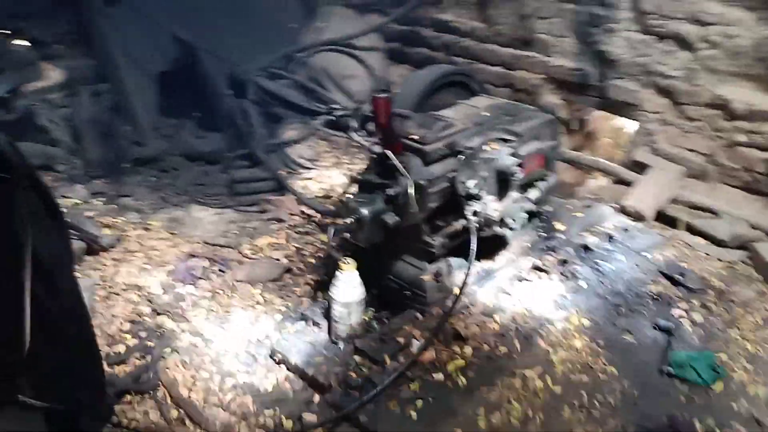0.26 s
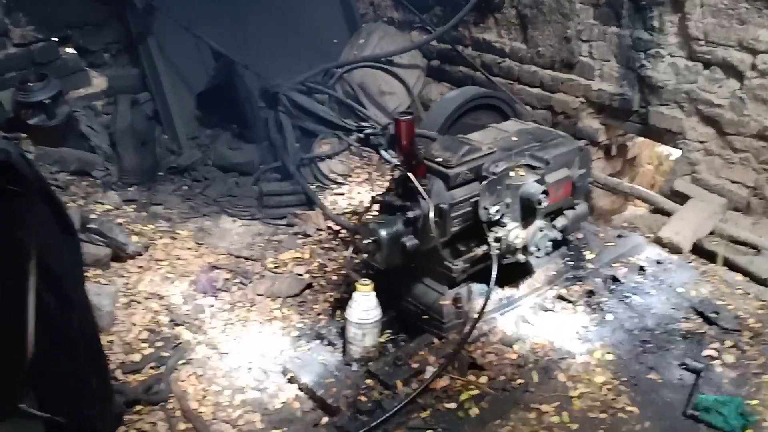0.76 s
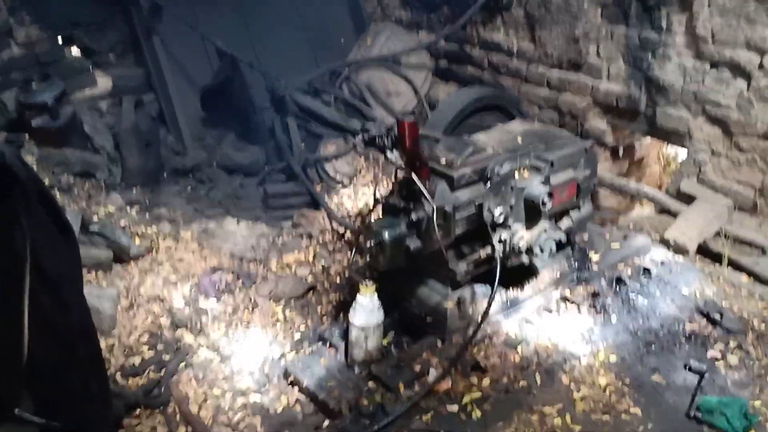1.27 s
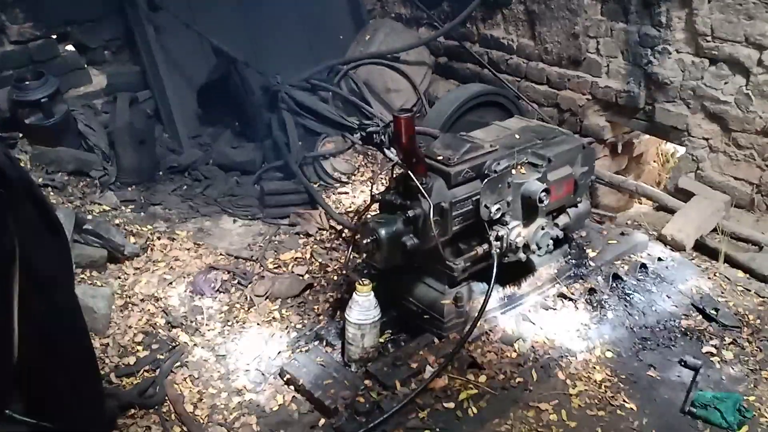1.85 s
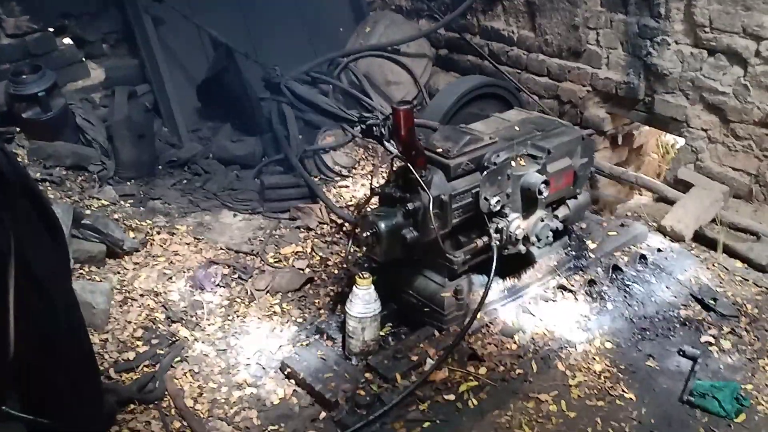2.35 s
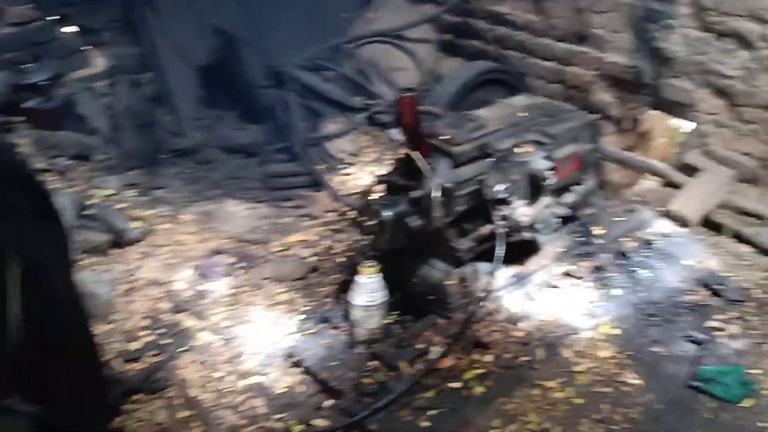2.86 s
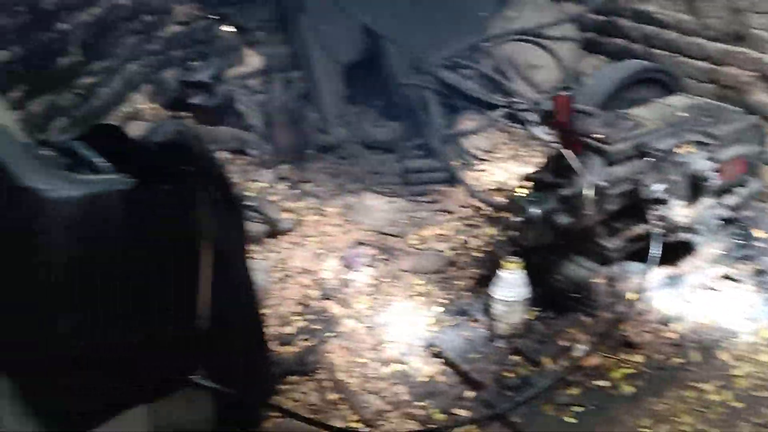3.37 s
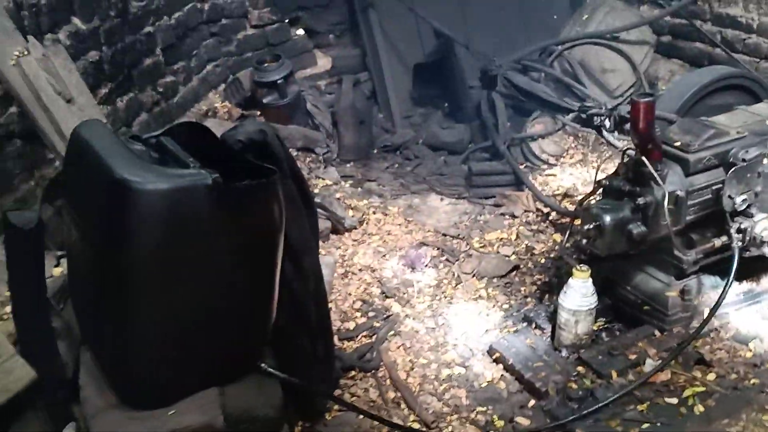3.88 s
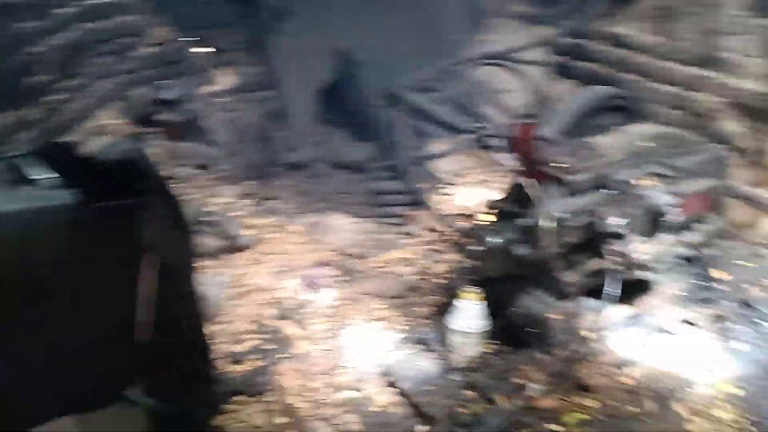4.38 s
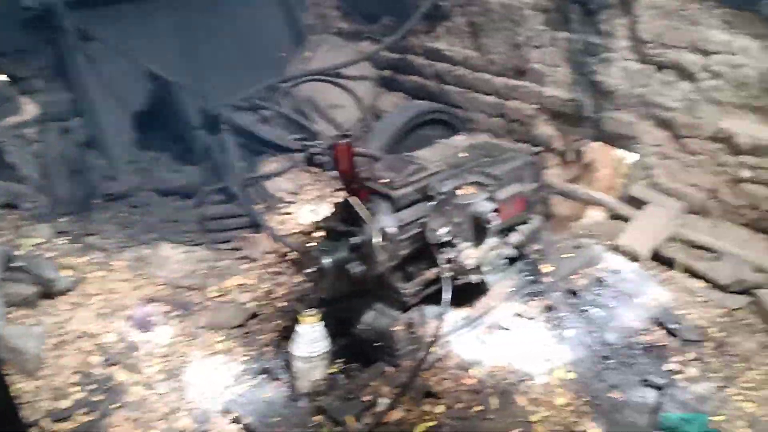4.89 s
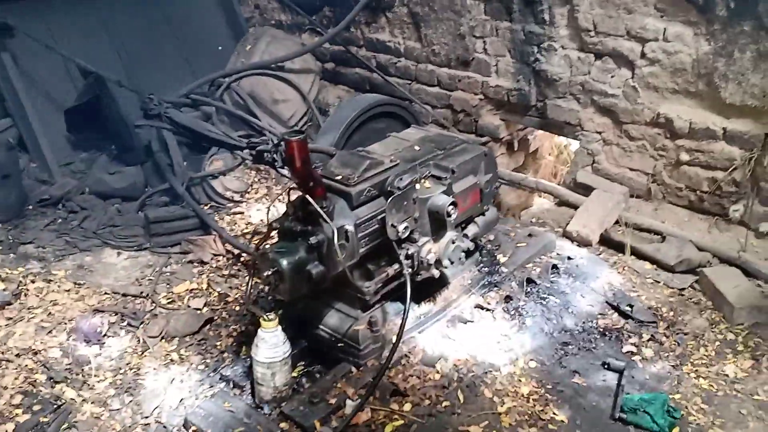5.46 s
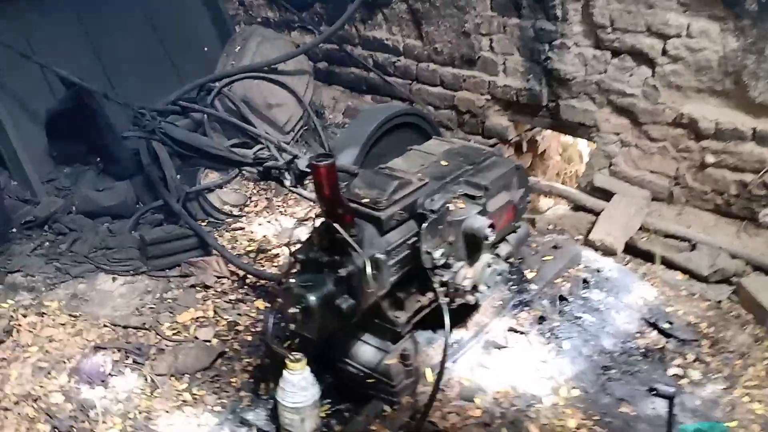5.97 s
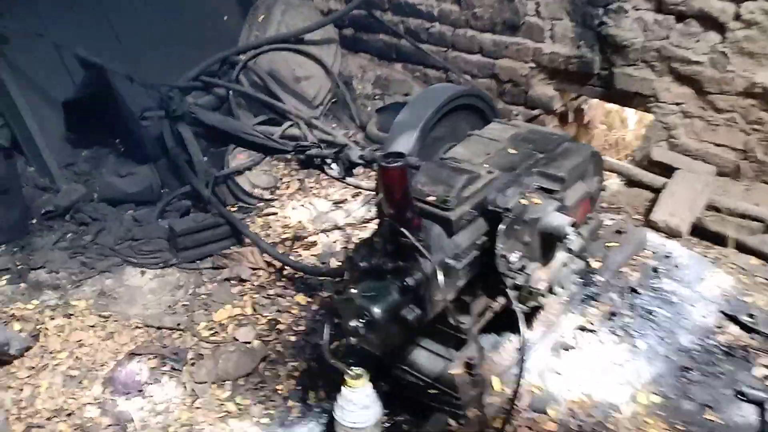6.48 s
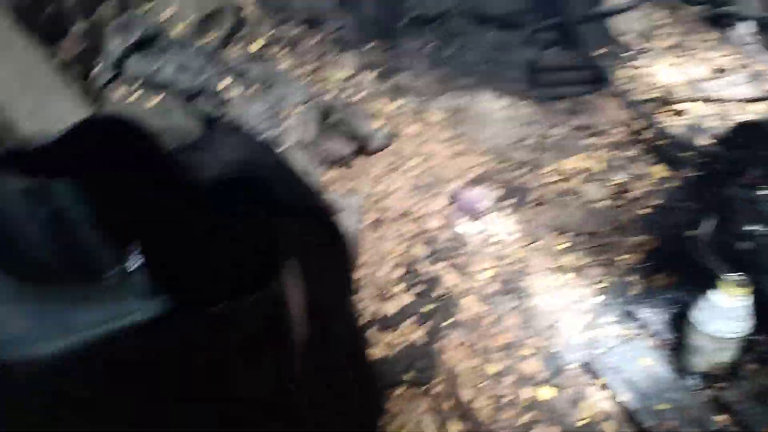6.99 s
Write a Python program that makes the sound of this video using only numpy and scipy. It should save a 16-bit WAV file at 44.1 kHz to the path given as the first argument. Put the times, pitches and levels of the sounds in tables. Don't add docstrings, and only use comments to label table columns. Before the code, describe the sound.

From 0 to about 0.7 seconds, a single-cylinder diesel engine is heard across a boomy shed: rough exhaust blasts roughly every 0.094 seconds, blurred by long echoes and a low boom at each firing. At 0.7 the scene cuts at once to beside the engine. The chugging continues at the same quick, steady pace to the end near 7.2 seconds, now drier and sharper, each fluttering gas burst ringing the thin silencer shell, then valve, rocker and pump knocks on the iron block, with a tiny injector hiss. From 1.3 to 1.7 the tone turns more mid-heavy, then brighter until 2.3. Individual blasts vary in strength, with stronger ones around 3, 3.7 and 6.3. After 4.4 the block knocks grow fuller and closer. Faint running water with small splashes and a soft low rumble lie beneath. Stereo, bass-thin small microphone.

```python
import sys
import numpy as np
from scipy import signal
from scipy.fft import rfft, irfft, next_fast_len
from scipy.io import wavfile
from scipy.ndimage import uniform_filter1d

SR = 44100
rng = np.random.default_rng(int(sys.argv[2]) if len(sys.argv) > 2 else 0)


def unload_wav(signal):
    wavfile.write(
        sys.argv[1],
        SR,
        np.round(np.clip(np.atleast_2d(signal).T, -1, 1) * 32767).astype(np.int16),
    )


def linear_from_db(decibels):
    return 10 ** (np.asarray(decibels, float) / 20)


N = 319284
T = np.arange(N) / SR
M = next_fast_len(N)
HZ = np.fft.rfftfreq(M, 1 / SR)

CUT_S = .695
CYCLE_S = .093872
FIRST_BLAST_S = .7211
SEAT_S = .026


def along(table, hz=HZ):
    f, db = np.transpose(table)
    return np.interp(np.log(hz + 1), np.log(f), db)


def level(x, db):
    return x * linear_from_db(db) / np.sqrt(np.mean(x ** 2))


def walk(rate):
    k = int(SR / rate)
    held = np.repeat(rng.standard_normal(N // k + 1), k)
    return 1.18 * uniform_filter1d(held, k)[:N]


def ring(x, hz, t60):
    p = np.exp(2j * np.pi * hz / SR - np.log(1000) / (t60 * SR))
    return signal.lfilter([0, p.imag], [1, -2 * p.real, abs(p) ** 2], x)


def pair(same_hz, same=.7):
    mid, side = rfft(rng.standard_normal((2, M)))
    likeness = same / (1 + (HZ / same_hz) ** 3)
    return mid * np.sqrt(1 + likeness) + np.array([[1], [-1]]) * side * np.sqrt(1 - likeness)


def strikes(s, db, contact_ms):
    x = np.zeros(N)
    keep = (s >= 0) & (s < T[-1])
    x[(s[keep] * SR).astype(int)] = linear_from_db(db[keep])
    push = np.hanning(int(contact_ms * SR / 1000) + 3)
    return np.convolve(x, push / push.sum())[:N]


# pitch_hz, level_db, t60_s
SHELL_PANELS = [(1100, -50.5, 0.034), (1960, -53, .04), (2377, -48, .04), (2752, -42.5, 0.039),
                (3100, -43, .04), (4154, -45, .06), (4567, -45, .05), (5000, -43.5, 0.034),
                (5590, -46.5, 0.034)]


def exhaust(s, band_db, pan_db, gas_db, ear_tilt, blast_shape, same_hz, same, size):
    rise, hold, sag_db, flutter_db, *t60, db = blast_shape
    t = T[:size]
    latest = np.clip(np.searchsorted(s, t) - 1, 1, None)
    side = np.array([[.5], [-.5]])
    jet = pair(same_hz, same) * linear_from_db(gas_db + side * along(ear_tilt))
    low = 1 / (1 + (HZ / 1650) ** 5)
    high = 1 / (1 + (3300 / (HZ + 1)) ** 6)
    gas = 0
    for share, gain_db, tail in zip((low, 1 - low - high, high), band_db, t60):
        power = 0
        for j in (latest, latest - 1):
            age = np.clip(t - s[j], 0, None)
            fade_db = sag_db * np.minimum(age / hold, 1) - 60 * np.clip(age - hold, 0, None) / tail
            onset = np.minimum(age / rise, 1) ** 1.5
            power = power + (onset * linear_from_db(gain_db[j] + fade_db)) ** 2
        eddies_db = flutter_db * (walk(300) + np.array([walk(90), walk(90)]))[:, :size]
        gas = gas + np.sqrt(power) * linear_from_db(eddies_db) * irfft(jet * share, M)[:, :size]
    mix_db = 5.36 * rng.standard_normal((len(s), len(SHELL_PANELS))).T
    shell = 0
    for (hz, panel_db, panel_t60), mix in zip(SHELL_PANELS, mix_db):
        shell = shell + ring(gas * linear_from_db(panel_db + mix)[latest], hz, panel_t60)
    return level((gas + shell) * linear_from_db(side * pan_db[latest]), db)


# start_s, peak_db
FAR_BLASTS = [(0.0932, -11.5), (0.1835, -14.5), (0.2773, -12.5), (0.3721, -11.5), (0.4664, -11),
              (0.5597, -17), (0.6525, -13)]
# pitch_hz, level_db (per Hz)
FAR_GAS_TONE = [(80, -31), (140, -11), (250, -7), (420, -12.5), (650, -6.5), (850, -8.5), (1350, -6),
                (1750, -8.5), (2400, -5.5), (3000, -6.5), (3700, -9), (5200, -11.5), (11000, -26),
                (14900, -22), (16500, -47)]
# pitch_hz, difference_db
FAR_EAR_TILT = [(60, 2), (1000, 2), (1900, .6), (2800, 6), (3900, 4), (5400, -11), (6600, -5), (9200, 8),
                (12000, -1), (15000, -14)]
# rise_s, hold_s, sag_db, flutter_db, low_t60_s, middle_t60_s, high_t60_s, level_db
FAR_BLAST_SHAPE = (.006, .035, -1, 1.5, 1.1, .45, 0.26, -20.5)
# delay_ms (after the blast), pitch_hz, level_db, t60_s
FAR_RINGS = [(2, 86, -20.5, .2), (2, 102, -24, .1), (20, 125, -29, .12), (30, 225, -27.5, 0.11),
             (29.94, 256, -28.5, 0.23), (29.95, 610, -30, .4), (30.03, 685, -29, .4)]


def far():
    first_s, first_db = FAR_BLASTS[0]
    earlier = [(first_s - back * CYCLE_S, first_db) for back in (2, 1)]
    s, peak_db = np.transpose(earlier + FAR_BLASTS)
    size = SR
    gas = exhaust(s - .003, [.35 * peak_db] * 3, 0 * s, along(FAR_GAS_TONE), FAR_EAR_TILT,
                  FAR_BLAST_SHAPE, same_hz=770, same=.95, size=size)
    boom = 0
    for ms, hz, db, t60 in FAR_RINGS:
        push = strikes(s + ms / 1000, 0 * s, 300 / hz)[:size]
        boom = boom + linear_from_db(db) * ring(push, hz, t60)
    boom = signal.sosfilt(signal.butter(3, 66, "high", fs=SR, output="sos"), boom)
    return np.pad(gas + boom * linear_from_db(np.array([[.8], [-.8]])), ((0, 0), (0, N - size)))


# time_s, load_db
ENGINE_LOAD = [(.72, 1.5), (1.0, -1.3), (1.25, 0.7), (1.5, -.5), (2.05, 1.4), (2.35, 1), (2.6, -1.3),
               (2.88, -1.7), (3.05, .9), (3.3, -1.8), (3.55, -.4), (3.95, -1.9), (4.4, -1.2), (4.6, 0.8),
               (5.1, 0.75), (5.7, -0.5), (5.95, -1.2), (7.24, 1.16)]
# time_s, extra_db
ODD_CHARGES = [(1.0, -1.2), (2.03, .8), (2.13, -1.3), (2.97, 2.0), (3.07, 1.0), (3.63, 1.8), (3.72, 2),
               (4.1, 1.5), (4.19, 1.4), (4.29, -1.5), (4.76, -1.8), (4.94, 1.3), (5.23, -3.4), (6.26, 3.2),
               (6.35, 2.1), (6.73, 1.4), (6.82, -0.8), (6.92, -0.8), (7.2, 1)]
# start_s, end_s, low_db, middle_db, high_db
FLAP_SPELLS = [
    (1.33, 1.52, -2, 2.5, -1),
    (1.52, 1.7, -0.9, 5.5, -0.7),
    (1.7, 2.27, -.5, -1.3, 1.1),
]


def firings(crank):
    load_db = np.interp(crank, *np.transpose(ENGINE_LOAD))
    for s, extra_db in ODD_CHARGES:
        load_db[np.argmin(abs(crank - s))] += extra_db
    flap_db = 0
    for start, end, *tone_db in FLAP_SPELLS:
        flap_db = flap_db + np.outer(tone_db, (crank > start) & (crank < end))
    return np.outer((1, 1.18, 0.81), load_db) + flap_db


# delay_ms (after the exhaust valve seats), level_db, contact_ms, sign
CYCLE_KNOCKS = [
    (0, 0, 1.77, -1.01),
    (7.496, -5, 1.1, 1),
    (27.01, -6, 0.59, 0.97),
    (39.52, -6.5, 2.23, -0.92),
    (51.92, -15.5, 0.73, 0.96),
]
# pitch_hz, level_db, t60_s, left_minus_right_db
BLOCK_MODES = [(88, -31, .1, 0), (129, -20.5, 0.048, 4), (155.6, -4.5, 0.058, 0), (203, -15.5, 0.076, -1),
               (251, -14.5, 0.072, 1), (308, -7.5, .14, 2), (385, -8.5, 0.058, 1), (467.7, -4.5, .065, 5),
               (571, -8, 0.076, 1), (639, -8.5, .07, -1), (706, -8.5, .16, 3), (1250, -16, .05, 1.5)]
# time_s, closeness (0-1), left_minus_right_db (used as departure from the
LISTENER_STANCE = [(.7, 0.1, 2), (1.0, 0, 3), (1.25, 0.06, 2), (1.65, 0.1, 3.5), (2.5, .03, 3),
                   (2.9, .05, 4), (4.4, 0.24, 4), (4.8, 0.36, 3.5), (5.5, 0.69, 3.5), (6.3, 1, 3.5),
                   (7.24, .95, 3.5)]


def block(blasts):
    seats = blasts + SEAT_S
    chance = rng.standard_normal((len(seats), len(CYCLE_KNOCKS) + 1, 2)).transpose(1, 2, 0)
    knocks = []
    for (ms, db, contact_ms, sign), (late, size) in zip(CYCLE_KNOCKS, chance):
        knocks.append(sign * strikes(seats + ms / 1000 + .0002 * late, db + 1.2 * size, contact_ms))
    force = sum(knocks)

    s, closeness, _ = np.transpose(LISTENER_STANCE)
    close = np.interp(T, s, closeness)
    tank_db = -2 + 12.5 * close
    cover_db = -1 + 9 * close
    knock_db = .2 + .4 * close
    frame_db = np.interp(T, (2.7, 3.5), (1.5, -3))
    part_db = {5: tank_db, 7: frame_db, 10: cover_db}

    out = 9.5 * (force - uniform_filter1d(force, size=300)) * np.ones((2, 1))
    for i, (hz, db, t60, pan_db) in enumerate(BLOCK_MODES):
        push = knocks[0] if i == 5 else force
        split_hz = 1100 / hz * (-1) ** i
        left = ring(push, hz + split_hz, t60) * linear_from_db(pan_db / 2)
        right = ring(push, hz - split_hz, t60) * linear_from_db(-pan_db / 2)
        out += linear_from_db(db + part_db.get(i, 0)) * np.array([left, right])
    out = signal.sosfilt(signal.butter(4, 112, "high", fs=SR, output="sos"), out)

    tick_ms, tick_hz, tick_db = 48, 3220, -47.5
    snap = strikes(seats + tick_ms / 1000 + .002 * chance[-1, 0], 3.0 * chance[-1, 1], .1)
    hiss = np.convolve(snap, np.hanning(500))[:N] * ring(rng.standard_normal(N), tick_hz, .002)
    return linear_from_db(-21 + knock_db) * out + level(hiss, tick_db) * np.array([[1], [.45]])


# pitch_hz, level_db (per Hz)
WATER_TONE = [(24, -45), (40, -15), (140, 1), (1340, -6), (2630, -5), (4680, -8), (7540, -27), (13800, -30),
              (16000, -41)]
# pitch_hz, level_db
PIPE_AND_MIC_TONE = [(50, -10), (100, -8.5), (160, -4.5), (320, -3.5), (700, -.5), (4400, -0.5), (5600, 2.5),
                     (15000, 2)]


def water():
    fizz = linear_from_db(2.0 * walk(6) + 2.3 * walk(150))
    tone = linear_from_db(along(WATER_TONE) + along(PIPE_AND_MIC_TONE))
    flow = irfft(pair(500, .3) * tone, M)[:, :N]
    return level(flow * fizz, -45.5)


def rumble():
    band = signal.butter(2, (25, 82), "band", fs=SR, output="sos")
    shake = signal.sosfilt(band, rng.standard_normal((2, N)))
    turn = np.cos(4 * np.pi * (T - FIRST_BLAST_S - SEAT_S) / CYCLE_S)
    return level(shake * linear_from_db(6 * turn), -42.5)


# pitch_hz, level_db (per Hz)
NEAR_GAS_TONE = [(29, -45), (50, -13), (139, -2.5), (273, -3.5), (309, 0.5), (366, -5.5), (466, -2),
                 (501, -2.5), (1320, -7.5), (2430, -3), (3410, -9), (4340, -5), (7590, -22), (10000, -25.5),
                 (15000, -24.5), (16500, -45)]
# pitch_hz, difference_db
NEAR_EAR_TILT = [(60, 2), (500, 3.0), (1290, 1), (2600, 3.5), (3900, 7.5), (5400, -0.5), (6600, 0),
                 (9600, 8), (12000, 6.5), (15000, -2)]
# rise_s, hold_s, sag_db, flutter_db, low_t60_s, middle_t60_s, high_t60_s, level_db
NEAR_BLAST_SHAPE = (.0055, .021, -3.0, 1.45, .14, .16, .146, -20.2)


def near():
    crank = FIRST_BLAST_S + CYCLE_S * np.arange(-2, N / SR / CYCLE_S)
    late, aside, *scatter = rng.standard_normal((len(crank), 5)).T
    s, _, left_db = np.transpose(LISTENER_STANCE)
    pan_db = np.interp(crank, s, left_db - left_db.mean()) + .65 * aside
    blasts = crank - .0025 + .0005 * late
    band_db = firings(crank) + .5 * np.array(scatter)
    gas = exhaust(blasts, band_db, pan_db, along(NEAR_GAS_TONE) + along(PIPE_AND_MIC_TONE), NEAR_EAR_TILT,
                  NEAR_BLAST_SHAPE, same_hz=560, same=.38, size=N)
    return gas + block(crank) + water() + rumble()


def scene():
    close = np.clip((T - CUT_S) / .004 + .5, 0, 1)
    return far() * (1 - close) + near() * close


def top_cut(x):
    return signal.sosfilt(signal.butter(12, 16830, fs=SR, output="sos"), x)


def record(dry):
    x = signal.sosfilt(signal.butter(3, 68, "high", fs=SR, output="sos"), dry)
    x = np.tanh(.8 * x) / .8
    x = signal.sosfilt(signal.ellip(8, .2, 70, 15600, fs=SR, output="sos"), x)
    return top_cut(x)


dry = scene()
out = record(dry)
unload_wav(out)
```